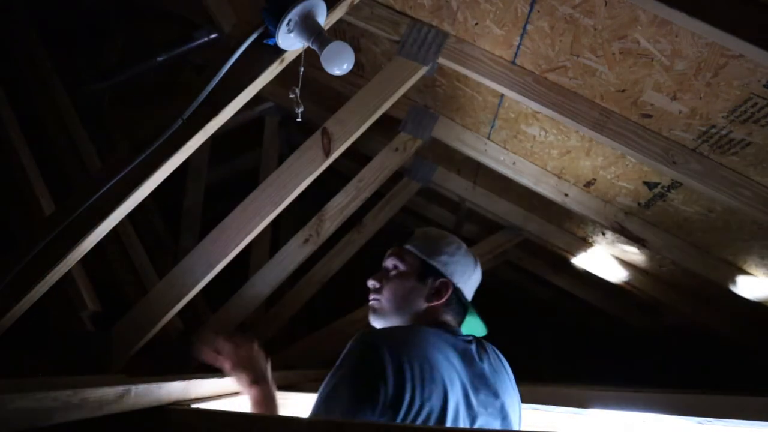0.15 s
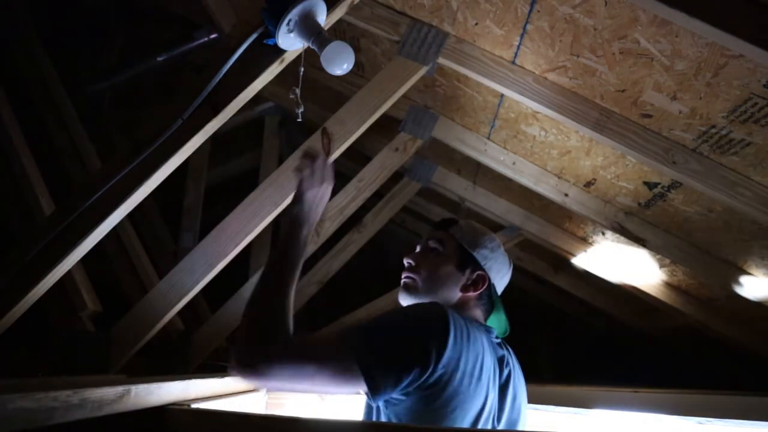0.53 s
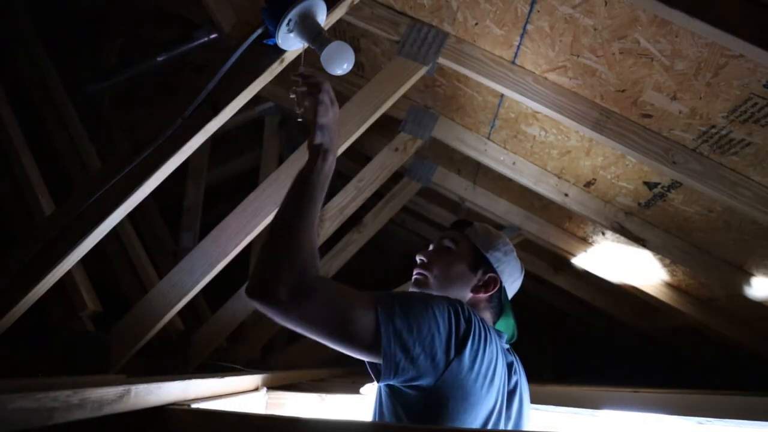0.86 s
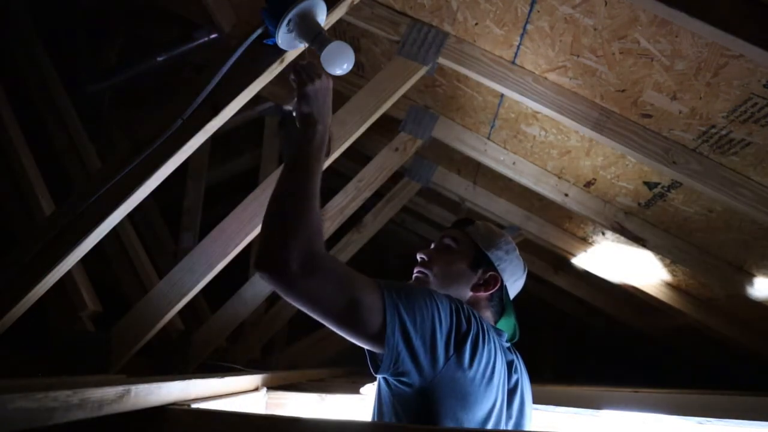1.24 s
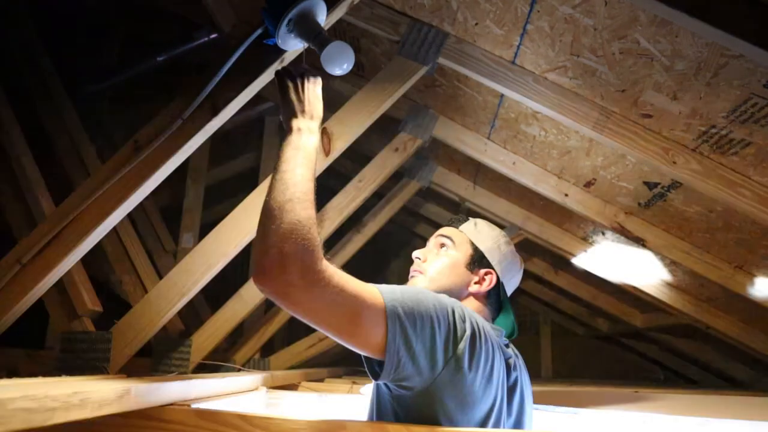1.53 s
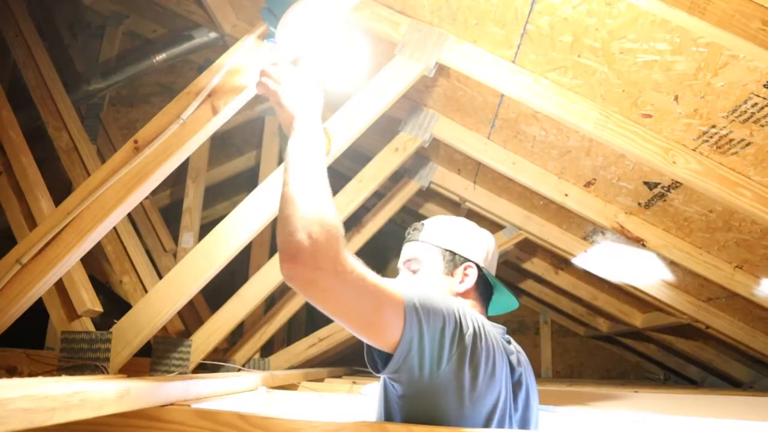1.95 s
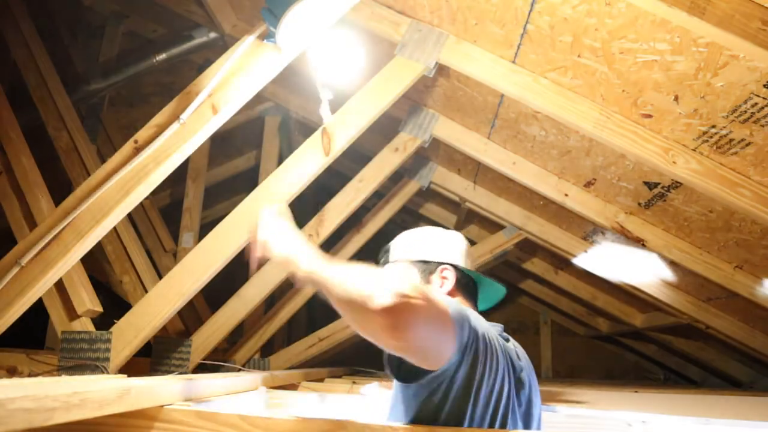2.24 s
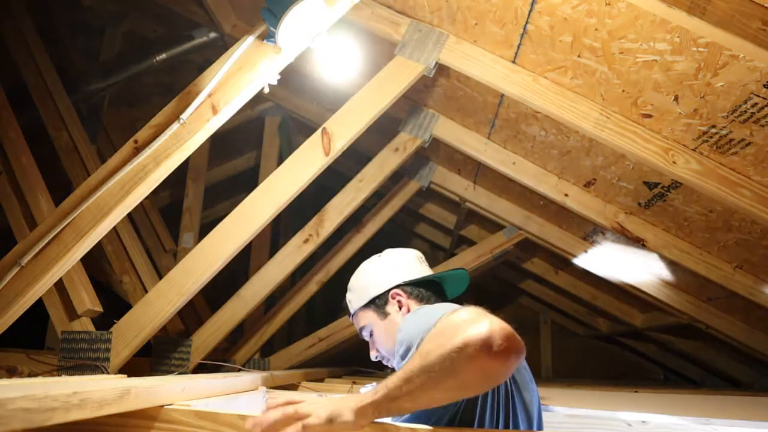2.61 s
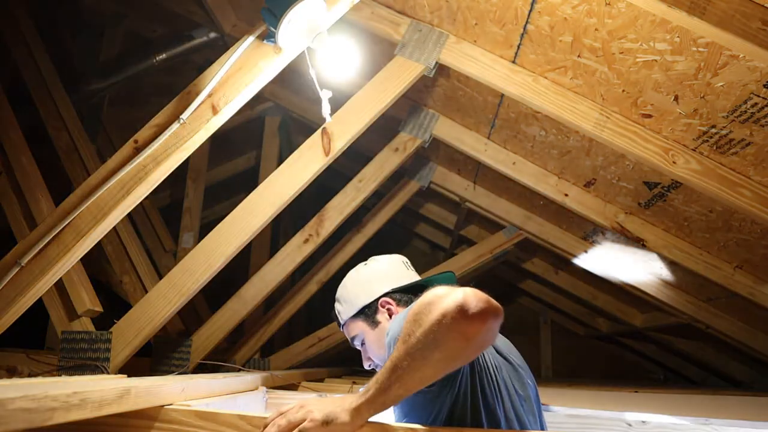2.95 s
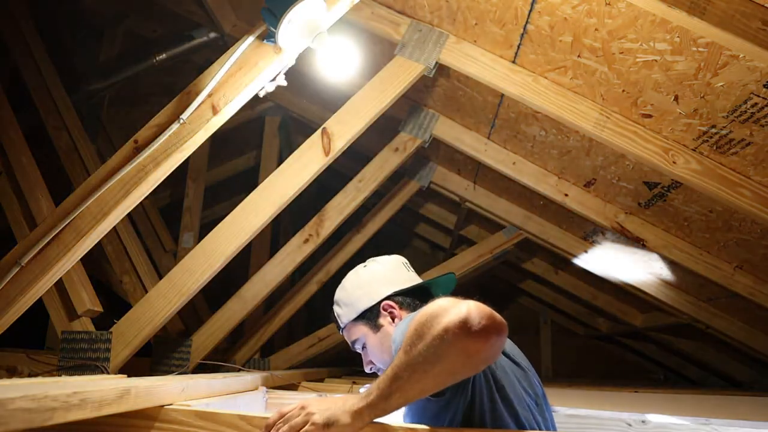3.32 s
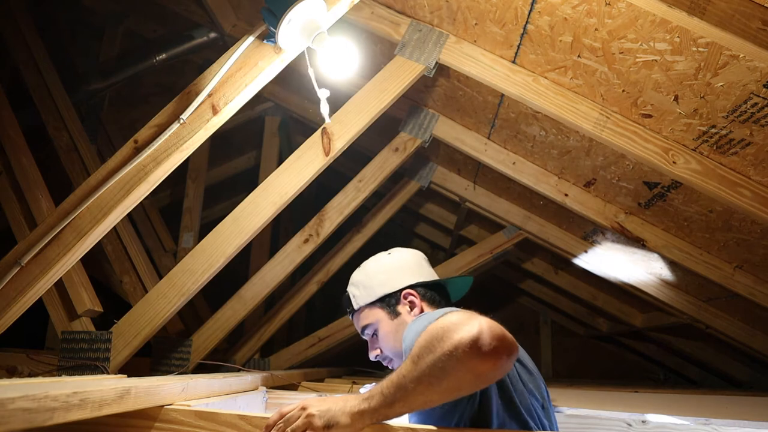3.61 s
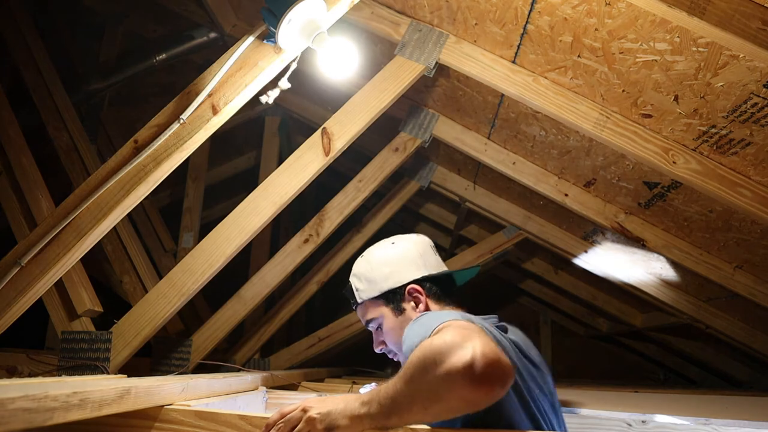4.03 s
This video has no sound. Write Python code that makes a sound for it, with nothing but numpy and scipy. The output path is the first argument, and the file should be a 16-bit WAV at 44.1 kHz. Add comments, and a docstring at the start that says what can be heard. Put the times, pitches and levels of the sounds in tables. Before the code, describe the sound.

Heard from close by in a small timber attic, a faint hum and soft clothing rustle lead into the rasp of a lamp's pull chain. The switch clicks sharply, then clicks again as the metal beads run back. A moment later a palm comes down on wood with a dull, soft thump. Very faint, thin, high whistles appear near the end over the steady low air noise.

```python
"""Pull-chain lamp in an attic

One microphone, close to a lamp holder on a rafter. The bead chain tightens, the switch snaps over,
the beads tick back through the eyelet and the spring snaps home. A hand then lands on a joist with
a soft thump. The bare timber answers briefly; underneath lie mains hum, a low rush of air,
a rustling shirt and, near the end, faint, thin whistles."""
import sys
import numpy as np
from scipy import signal
from scipy.fft import rfft, irfft
from scipy.io import wavfile
from scipy.ndimage import uniform_filter1d, map_coordinates

SR = 44100
rng = np.random.default_rng(int(sys.argv[2]) if len(sys.argv) > 2 else 0)


def int16_out(signal):
    """Quantize to a 16-bit WAV file."""
    q = np.round(np.clip(np.atleast_2d(signal).T, -1, 1) * 32767)
    wavfile.write(sys.argv[1], SR, q.astype(np.int16))


N = 183764


def amp(db):
    """Decibels to gain."""
    return 10 ** (np.asarray(db) / 20)


def unit(x):
    """x at rms 1."""
    return x / np.sqrt(np.mean(x ** 2) + 1e-20)


def along(points, hz):
    """(Hz, value) points read on a log frequency axis."""
    knots_hz, values = np.transpose(points)
    return np.interp(np.log(hz + 1), np.log(knots_hz), values)


def seconds(count):
    """A time axis of count samples."""
    return np.arange(count) / SR


def add(track, start, sound):
    """Mix a sound into the track, start seconds in."""
    part = track[round(start * SR):][:len(sound)]
    part += sound[:len(part)]


def fade(t, t60):
    """Exponential decay, 60 dB down at t60."""
    return np.exp(-np.log(1000) * t / t60)


def onset(t, rise_s):
    """A rise from 0 towards 1 with time constant rise_s."""
    return 1 - np.exp(-t / rise_s)


def wobble(rate, count=N):
    """A smooth random curve, rate knots a second."""
    knots = rng.standard_normal(int(count * rate / SR) + 4)
    return map_coordinates(knots, [seconds(count) * rate])


def noise(spectrum):
    """Steady noise of rms 1 with the given colour."""
    gain = amp(along(spectrum, np.fft.rfftfreq(N, 1 / SR)))
    return unit(irfft(rfft(rng.standard_normal(N)) * gain, N))


def lifted(spectrum, centre_hz, width_oct, lift_db):
    """The spectrum with a bell-shaped lift around one frequency."""
    hz = np.geomspace(50, SR / 2, 90)
    bell = np.exp(-.5 * (np.log2(hz / centre_hz) / width_oct) ** 2)
    return np.transpose([hz, along(spectrum, hz) + lift_db * bell])


def coloured(x, spectrum):
    """x through a minimum-phase filter of that colour which keeps the power of white noise."""
    size = 4096
    gain = unit(amp(along(spectrum, np.fft.rfftfreq(size, 1 / SR))))
    cepstrum = irfft(np.log(gain))
    cepstrum[1:size // 2] *= 2
    cepstrum[size // 2 + 1:] = 0
    response = irfft(np.exp(rfft(cepstrum)))
    return signal.fftconvolve(x, response)[:len(x)]


# The hum under everything. Each row: frequency in Hz, level in dB.
HUM_LINES = [(59.8, -56.5), (168, -65), (263.8, -66), (366, -67.5), (459, -71), (495, -64)]


def mains_hum():
    """Low, sustained tones, each a little unsteady in level and phase."""
    out, t = np.zeros(N), seconds(N)
    for hz, db in HUM_LINES:
        peak = np.sqrt(2) * amp(db + 2.44 * wobble(rate=4.05))
        drift = 1.04 * wobble(rate=4.33)
        out += peak * np.sin(2 * np.pi * hz * t + drift)
    return out


# The attic's air and the rumble below it. Each row: frequency in Hz, relative level in dB.
AIR_COLOUR = [(53, -64), (90, -7), (180, -5), (260, -2.5), (320, -10), (470, -5), (620, -10.5), (780, -15),
              (900, -12), (1150, -9.5), (1500, -11), (1650, -18), (2200, -19), (3800, -25.5), (7000, -28.5),
              (15500, -31)]
RUMBLE_COLOUR = [(15, -19), (35, -1), (60, 2.5), (100, -3.5), (200, -15.5), (400, -102)]
# Narrow tones in the air. Each row: frequency in Hz, level in dB.
AIR_WAVERS = [(915, -65), (1007, -79), (1071, -66), (1890, -73.5), (2010, -71.5), (2090, -73)]


def air():
    """A steady, low rush of air with rumble and a few wavering tones in it."""
    t = seconds(N)
    tones = sum(amp(db) * wobble(rate=22.1) * wave(2 * np.pi * hz * t)
                for hz, db in AIR_WAVERS for wave in (np.sin, np.cos))
    return tones + amp(-49) * noise(AIR_COLOUR) + amp(-59.5) * noise(RUMBLE_COLOUR)


# Shirt cloth. Each row: frequency in Hz, relative level in dB.
CLOTH_COLOUR = [(100, -39), (250, -25), (450, 1.5), (750, -8.5), (1150, -9.5), (1700, -22.5), (3000, -14),
                (3900, -15.5), (4400, -32), (8000, -40)]
# Its strokes; quick sliding hisses higher than slow folding.
# Each row: middle and length in seconds, level in dB, centre of the hiss in Hz.
SHIRT_STROKES = [(0.105, 0.15, -61, 1910), (0.349, 0.14, -61, 1100), (0.864, 0.17, -60, 1190),
                 (0.947, 0.1, -53.5, 470), (1.386, .16, -50, 438), (2.267, 0.12, -48.5, 1270),
                 (2.42, 0.24, -56, 3480), (2.57, 1.1, -56.5, 3420), (4.131, 0.19, -53, 1870)]


def shirt():
    """Cloth catches and slips as the arm reaches up, comes down and takes the body's weight."""
    out = np.zeros(N)
    for middle, length, db, centre_hz in SHIRT_STROKES:
        swell = signal.windows.tukey(int(length * SR), 0.65)
        catches_db = 2 * wobble(rate=22.1, count=len(swell))
        cloth = noise(lifted(CLOTH_COLOUR, centre_hz, width_oct=0.48, lift_db=11.5))
        add(out, max(middle - length / 2, 0), amp(db + catches_db) * swell * cloth[:len(swell)])
    return out


# Echoes off the near roof boards. Each row: delay in seconds, relative gain.
ROOF_ECHOES = [(.0028, 0.35), (.0067, 0.17), (.0083, .35), (0.018, 0.032)]
# The attic's short tail. Each row: frequency in Hz, t60 in seconds.
ATTIC_DECAY = [(200, 0.48), (800, 0.24), (2000, 0.25), (5500, 0.21), (15000, 0.17)]


def contact(spectrum, t60, roof_gain, room_db):
    """A short burst reaches the microphone, followed by the near boards' echoes and the attic's tail."""
    t = seconds(SR // 2)
    burst = unit(np.tanh(rng.standard_normal(len(t)))) * fade(t, t60)
    near = burst.copy()
    for delay, gain in ROOF_ECHOES:
        add(near, delay, roof_gain * gain * burst)
    hz, frame_times, bands = signal.stft(rng.standard_normal(len(t)), SR, nperseg=256)
    bands *= fade(frame_times, along(ATTIC_DECAY, hz)[:, None])
    tail = signal.istft(bands, SR, nperseg=256)[1][:len(t)]
    return coloured(near + amp(room_db) * tail * onset(t, 0.001), spectrum)


def ring(modes, t, scatter_db, blur_hz):
    """Damped modes struck at varying strengths; loose joints let the phases wander, blurring each line."""
    hz, db, t60 = np.transpose(modes)[:, :, None]
    strength = rng.choice([-1, 1], hz.shape) * amp(db + scatter_db * rng.standard_normal(hz.shape))
    walk = np.cumsum(rng.standard_normal((len(hz), len(t))), axis=1)
    drift = uniform_filter1d(walk * np.sqrt(2 * np.pi * blur_hz / SR), size=200, axis=1)
    return np.sum(strength * fade(t, t60) * np.sin(2 * np.pi * hz * t + drift), axis=0)


# The lamp holder, rung by beads and switch. Each row: frequency in Hz, relative dB, t60 in seconds.
HOLDER_MODES = [(1051, -11, .14), (1303, -8, .21), (1398, -7, .18), (1499, 0, .2), (1551, -5, .17),
                (1611, -10, .24), (1675, -6, .26), (1740, -14, .22), (1815, -9, .19), (2109, -11, .17),
                (2236, -12, .14), (3118, -9, .13), (3270, -7, .17), (3345, -8, .14), (3630, -11, .17),
                (3692, -4, .13), (3790, -3, .12), (3838, -1, .16), (4078, -10, .15), (4953, -12, .15),
                (5200, -13, .14), (5900, -14, .13), (7337, -14, .14), (7600, -12, .12), (9254, -19, .14),
                (10950, -12, .08), (11210, -15, .1), (13300, -17, .11)]
# A crack on the holder and a tick on the eyelet. Each row: frequency in Hz, relative level in dB.
CRACK_COLOUR = [(100, -32), (300, -18.5), (550, -15), (800, -4), (1200, 0.5), (2000, -2.5), (2800, -2),
                (3800, 1.5), (5500, -5), (6500, -9), (7800, -6), (10000, -16.5), (13500, -17), (16000, -34)]
TICK_COLOUR = [(500, -37), (2500, -9), (5000, -2), (6400, 2.5), (7600, 0.5), (9300, -4), (11800, 0.5),
               (14000, -6), (16000, -3.5)]
# The chain is touched, gripped, drawn out ever harder, then runs back.
# Each row: start in seconds, tick level in dB, knock level in dB, pitch of the tick in Hz.
BEAD_HITS = [(1.215, -52, -55, 6000), (1.443, -64, -57, 3800), (1.4723, -40, -38, 4750),
             (1.489, -59, -45, 4400), (1.498, -56, -43, 4400), (1.5518, -51, -33, 3700),
             (1.5663, -48, -36, 3500), (1.587, -43, -39, 6300), (1.592, -39, -41, 6200),
             (1.6055, -36, -30, 6100), (1.6235, -33, -46, 6500), (1.635, -28, -24, 12300),
             (1.815, -56, -38.5, 3900), (1.839, -18.5, -27.5, 6130), (1.8611, -20.5, -29.5, 12400),
             (1.881, -15.5, -29.5, 11400), (1.8996, -17.5, -29.5, 5940)]


def chain_beads():
    """Each bead ticks brightly on the metal eyelet and gives the holder a small, dull knock."""
    out, t = np.zeros(N), seconds(SR // 2)
    dull = signal.butter(2, 4200, fs=SR)
    for start, tick_db, knock_db, pitch_hz in BEAD_HITS:
        colour = lifted(TICK_COLOUR, pitch_hz, width_oct=0.18, lift_db=4)
        add(out, start, amp(tick_db) * contact(colour, t60=0.017, roof_gain=0.11, room_db=-17))
        knock = contact(CRACK_COLOUR, t60=0.02, roof_gain=0.41, room_db=-3.5)
        holder = amp(-19.5) * ring(HOLDER_MODES, t, scatter_db=3, blur_hz=6.9)
        add(out, start, amp(knock_db) * signal.lfilter(*dull, knock + holder))
    return out


# One slip of the chain. Each row: frequency in Hz, relative level in dB.
SLIP_COLOUR = [(130, -7), (300, -7.5), (700, 1), (1500, -0.5), (2200, -4.5), (3800, -11), (6500, -21.5),
               (15000, -39)]
# Drags between the ticks. Each row: start and end in seconds, first and last level in dB.
CHAIN_DRAGS = [(1.485, 1.551, -45, -48.5), (1.552, 1.64, -45.5, -35), (1.814, 1.92, -49.5, -30)]


def chain_grating():
    """The taut chain grates over the eyelet in many tiny slips."""
    out = np.zeros(N)
    slips_per_s = 1600
    for start, end, start_db, end_db in CHAIN_DRAGS:
        slips = (rng.random(N) < slips_per_s / SR) * rng.uniform(-0.98, 1, N)
        grain = contact(SLIP_COLOUR, t60=0.0058, roof_gain=0.33, room_db=-16.5)
        rasp = unit(signal.fftconvolve(slips, grain)[:N])
        level = amp(np.linspace(start_db, end_db, int((end - start) * SR)))
        add(out, start, level * signal.windows.tukey(len(level), .15) * rasp[-len(level):])
    return out


def pushed_timber(modes, push_s):
    """Timber bends under a soft, one-sided push; a longer push moves only the lowest modes."""
    t = seconds(SR)
    hz, db, t60 = np.transpose(modes)[:, :, None]
    bending = np.sum(amp(db) * fade(t, t60) * np.sin(2 * np.pi * hz * t), axis=0)
    push = np.sin(np.pi * np.minimum(t / push_s, 1)) ** 2
    low_cut = signal.butter(2, 36, 'high', fs=SR)  # timber radiates little below this
    return signal.lfilter(*low_cut, signal.fftconvolve(-push / push.sum(), bending))


# The rafter carrying the lamp. Each row: frequency in Hz, relative level in dB, t60 in seconds.
RAFTER_MODES = [(43, -1.5, 1), (131.3, -1.5, 0.58), (155.6, 0, 0.35), (205, -22, 0.23)]
# Changes in its load. Each row: start in seconds, strength in dB, length in seconds.
RAFTER_PUSHES = [(1.548, -43, .012), (1.6398, -42, 0.0013)]


def rafter():
    """The rafter takes the pull and gives a low thud when the first snap frees it."""
    out = np.zeros(N)
    for start, db, push_s in RAFTER_PUSHES:
        add(out, start, amp(db) * pushed_timber(RAFTER_MODES, push_s))
    return out


# The return spring and the junction box. Each row: frequency in Hz, relative dB, t60 in seconds.
SPRING_MODES = [(1147, -4, .42), (2008, -1, .21), (2236, -1, .18), (2708, -2, .14), (4036, -4, .15),
                (4888, -4, .1), (5620, -4, .17), (6923, -8, .15), (7267, -9, .19), (8183, -3, .17),
                (8330, -5, .16), (8480, -6, .15), (8629, -7, .12)]
BOX_MODES = [(225, -16, .22), (291, -10, .17), (350, -8, .22), (522, -16, .11), (578, -4, .22),
             (623, -7, .28), (700, -2, .2), (725, -4, .17), (797, -2, .18), (851, -12, .18), (945, -4, .17),
             (976, -4, .18)]
# The rotor's impact. Each row: frequency in Hz, relative level in dB.
IMPACT_COLOUR = [(200, -21), (700, 5), (1200, 12.5), (2000, -0.5), (4500, 10.5), (8000, -0.5), (10500, -1),
                 (13500, -3), (16000, 4.5)]
# The switch flips, hits its stop, springs back and seats. Each row: start in seconds, overall gain
# in dB, drive of impact, holder, spring and box in dB, the crack's t60 in seconds, treble cutoff in Hz.
SWITCH_SNAPS = [(1.6392, -9, 8.5, -9, -31, -30, 0.038, 14000),
                (1.6460, -14, -1, -9.5, -45, -19.5, 0.021, 5100),
                (1.9160, -10, -9, -16, -16, -19.5, 0.03, 7900),
                (1.9215, -16, -5, -26, -12, -11.5, 0.02, 2820)]


def switch():
    """The rotor snaps over under the pull; on release the spring returns it with a duller blow."""
    out, t = np.zeros(N), seconds(SR // 2)
    for start, db, impact_db, holder_db, spring_db, box_db, t60, cutoff_hz in SWITCH_SNAPS:
        impact = amp(impact_db) * contact(IMPACT_COLOUR, t60=0.012, roof_gain=0.046, room_db=-59)
        crack = contact(CRACK_COLOUR, t60, roof_gain=0.71, room_db=-12)
        holder = amp(holder_db - 2) * ring(HOLDER_MODES, t, scatter_db=1, blur_hz=4.3)
        spring = amp(spring_db - 6.5) * ring(SPRING_MODES, t, scatter_db=2.5, blur_hz=5.2)
        box = amp(box_db - 1) * ring(BOX_MODES, t, scatter_db=2.5, blur_hz=2.2)
        # the heavy box builds up more slowly
        ringing = onset(t, 0.002) * (holder + spring) + onset(t, 0.0056) * box
        soften = signal.butter(2, cutoff_hz, fs=SR)
        add(out, start, amp(db) * signal.lfilter(*soften, impact + crack + ringing))
    return out


# The joist under the hand. Each row: frequency in Hz, relative level in dB, t60 in seconds.
JOIST_MODES = [(43.7, -6, 1), (63.6, -7, 0.45), (86, 1.5, 0.23), (100, -4.5, .22), (145, -3, 0.19),
               (194, -6, .11), (259.5, -5, 0.27)]
# The palm's skin. Each row: frequency in Hz, relative level in dB.
SLAP_COLOUR = [(200, 17.5), (600, 7.5), (1200, 6), (2200, -12), (4000, -9), (7000, -14), (12000, -26)]
# Weight landing. Each row: start in seconds, push in dB, its length in seconds, slap in dB.
HAND_THUMPS = [(2.5796, -30.5, 0.0052, -33), (2.637, -29, 0.012, -40.5), (2.738, -40.5, 0.01, -43),
               (2.919, -44, 0.0098, -53)]


def hand_on_joist():
    """The palm meets the wood with a soft, dull slap and the arm's weight follows."""
    out, t = np.zeros(N), seconds(SR // 2)
    weight_lag_s = 0.00355
    for start, db, push_s, slap_db in HAND_THUMPS:
        add(out, start + weight_lag_s, amp(db) * pushed_timber(JOIST_MODES, push_s))
        slap = contact(SLAP_COLOUR, t60=0.028, roof_gain=0.23, room_db=-7)
        add(out, start, amp(slap_db) * slap * onset(t, 0.0008))
    return out


# Thin whistles. Each row: crest time, rise and fall in seconds, crest pitch in Hz, relative level in dB.
WHISTLE_ARCHES = [(3.355, 0.045, .07, 15000, -64), (3.41, .02, .03, 10300, -71),
                  (3.52, .05, .03, 15200, -72), (3.612, 0.06, 0.078, 14000, -62),
                  (3.62, 0.018, 0.035, 12100, -61), (3.70, 0.045, 0.018, 13900, -63),
                  (3.745, 0.062, 0.036, 13900, -61), (3.77, 0.043, 0.078, 12600, -62),
                  (3.83, 0.09, 0.066, 15200, -63), (3.89, 0.044, 0.047, 14800, -61),
                  (3.901, 0.042, 0.07, 11500, -61), (3.975, 0.029, 0.055, 12200, -63)]
# Lower and upper bounds for the fainter, random ones, in the same columns.
FAINT_ARCH_BOUNDS = [(3.3, .02, .02, 10000, -78), (3.98, .06, .07, 15500, -71)]


def whistles():
    """Faint, very high tones rise to a rounded crest and sink, each fluttering in a wisp of hiss."""
    out = np.zeros(N)
    glide_hz_per_s, rounding_s = 40000, 0.018
    fainter = list(rng.uniform(*FAINT_ARCH_BOUNDS, size=(26, 5)))
    for crest, rise, fall, crest_hz, db in WHISTLE_ARCHES + fainter:
        count = int((rise + fall) * SR)
        t = seconds(count) - rise
        waver_hz = 70 * wobble(rate=50, count=count) + 130 * wobble(rate=2500, count=count)
        arch_hz = crest_hz - glide_hz_per_s * (np.hypot(t, rounding_s) - rounding_s)
        phase = 2 * np.pi * np.cumsum(arch_hz + waver_hz) / SR
        wisp = amp(-6) * wobble(rate=1400, count=count) * np.cos(phase)
        level = amp(db - 1.5 + 3 * wobble(rate=110, count=count))
        add(out, crest - rise, level * signal.windows.tukey(count, .4) * (np.sin(phase) + wisp))
    return out


def scene():
    """The attic as it reaches one microphone near the lamp."""
    lamp = switch() + rafter() + chain_beads() + chain_grating()
    person = hand_on_joist() + shirt()
    ambience = whistles() + mains_hum() + air()
    return (lamp + person + ambience)[None]


def record(dry):
    """The recorder rounds off the highest peaks and keeps nothing above its band limit."""
    ceiling, top_hz = 0.9, 15950
    rounded = dry / (1 + np.abs(dry / ceiling) ** 6) ** (1 / 6)
    in_band = np.fft.rfftfreq(N, 1 / SR) < top_hz
    return irfft(rfft(rounded) * in_band, N)


dry = scene()
out = record(dry)
int16_out(out)
```